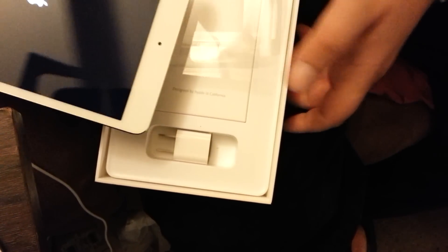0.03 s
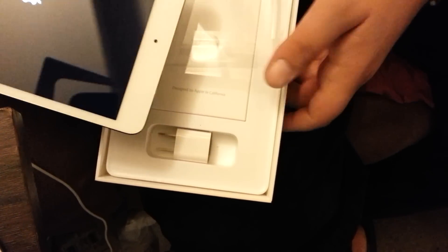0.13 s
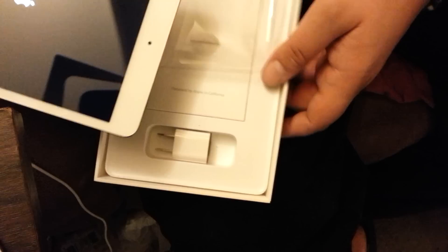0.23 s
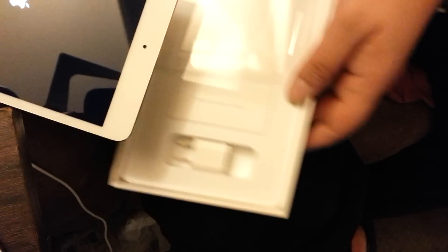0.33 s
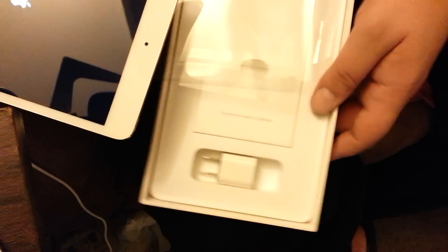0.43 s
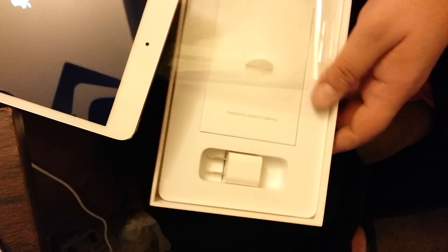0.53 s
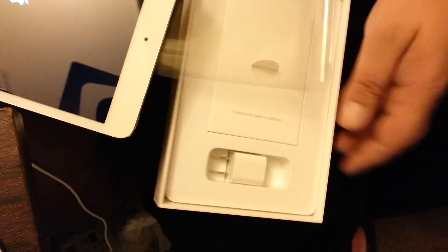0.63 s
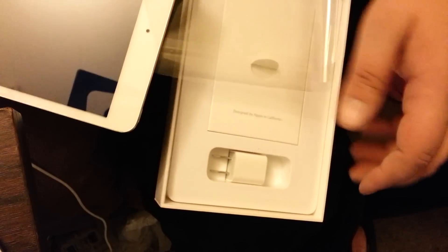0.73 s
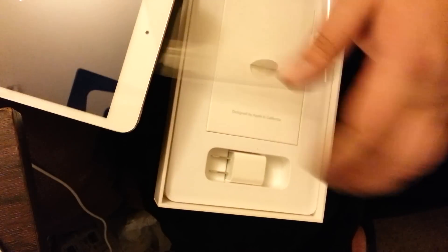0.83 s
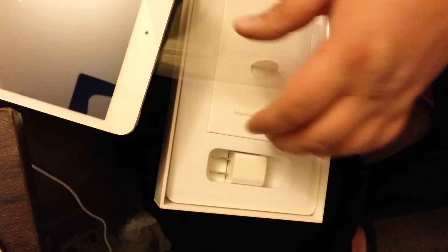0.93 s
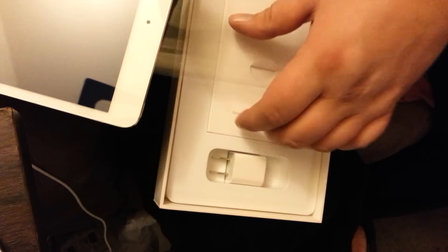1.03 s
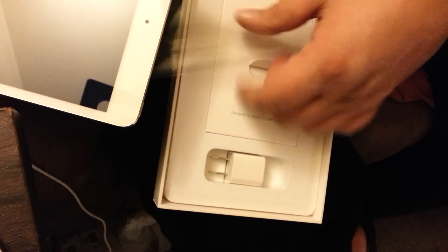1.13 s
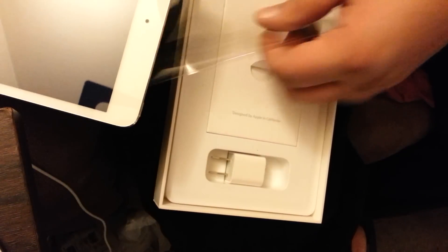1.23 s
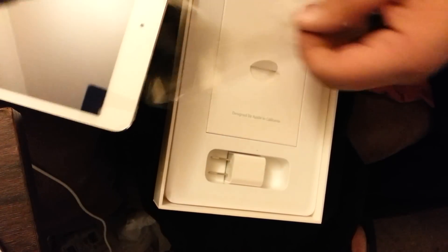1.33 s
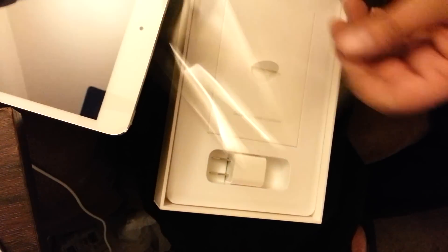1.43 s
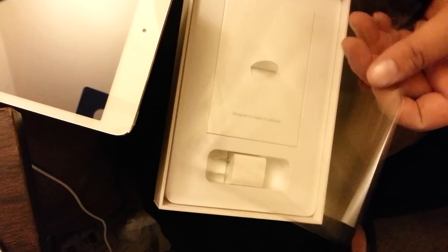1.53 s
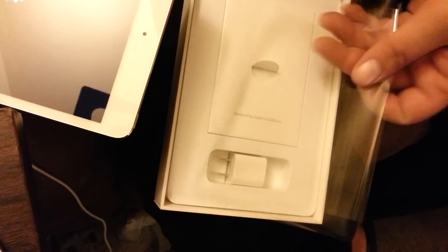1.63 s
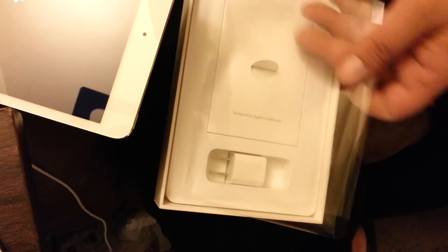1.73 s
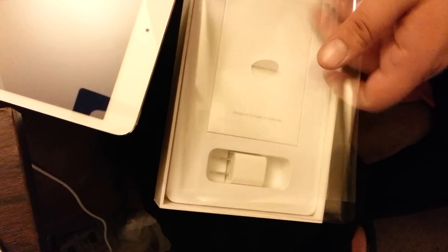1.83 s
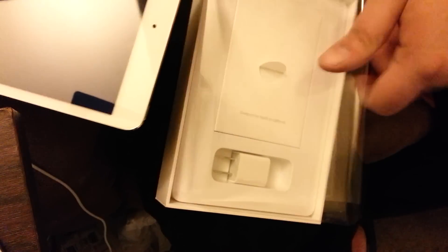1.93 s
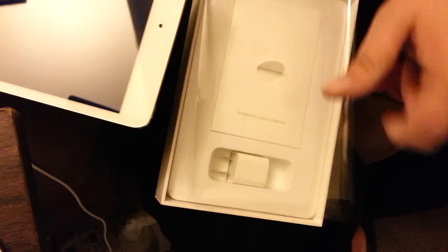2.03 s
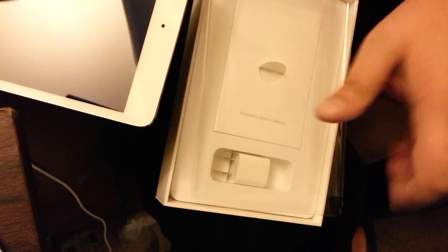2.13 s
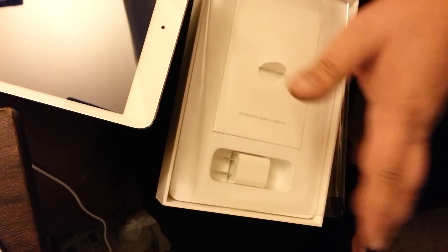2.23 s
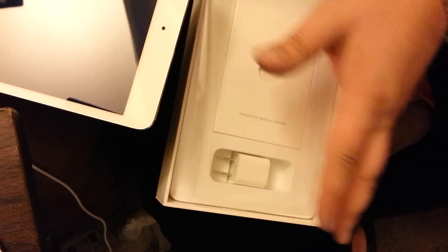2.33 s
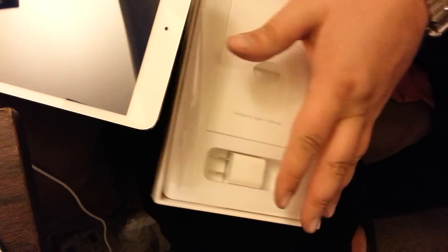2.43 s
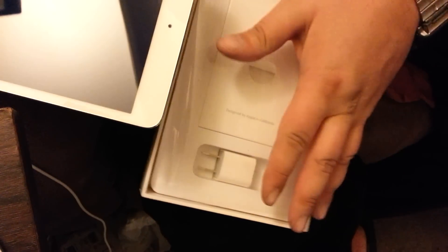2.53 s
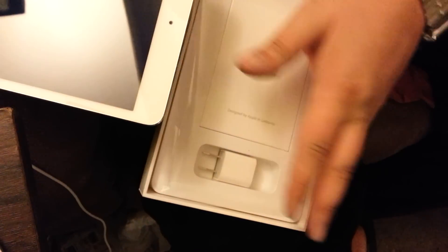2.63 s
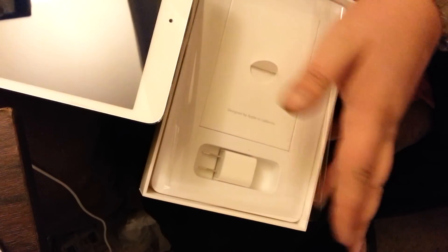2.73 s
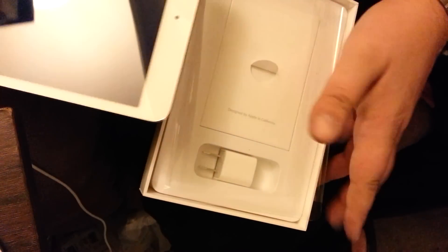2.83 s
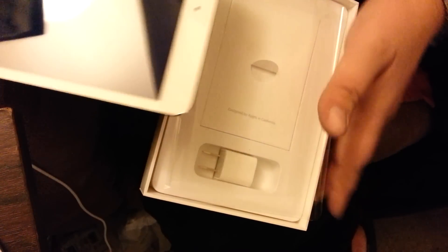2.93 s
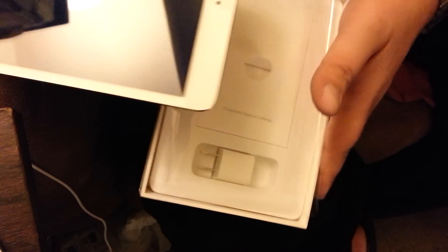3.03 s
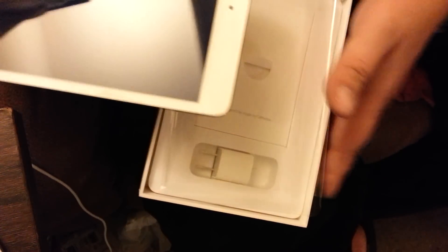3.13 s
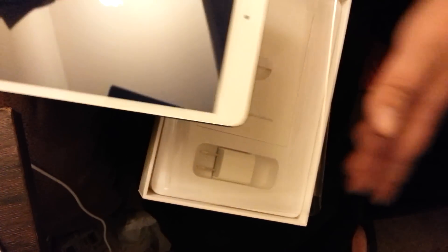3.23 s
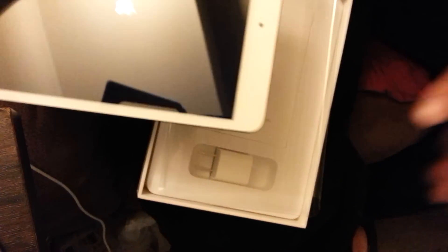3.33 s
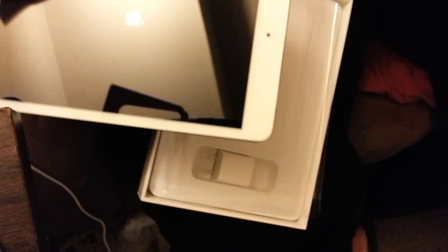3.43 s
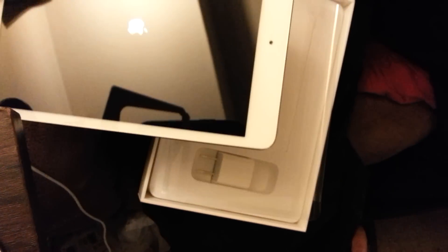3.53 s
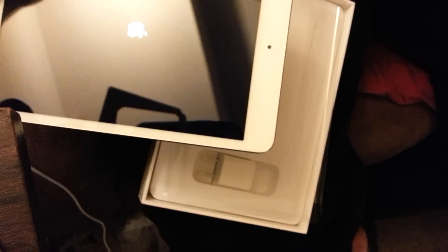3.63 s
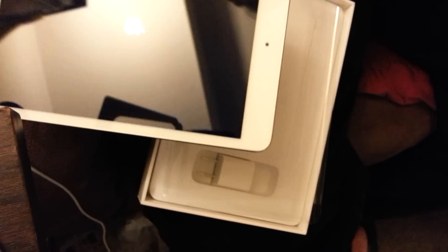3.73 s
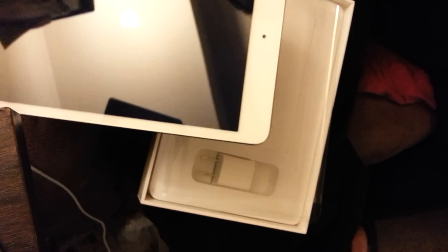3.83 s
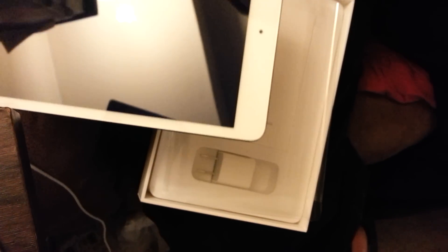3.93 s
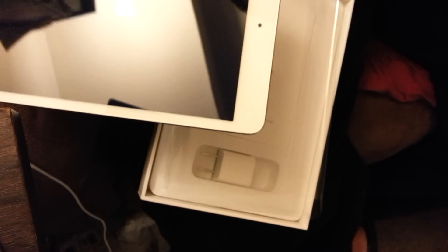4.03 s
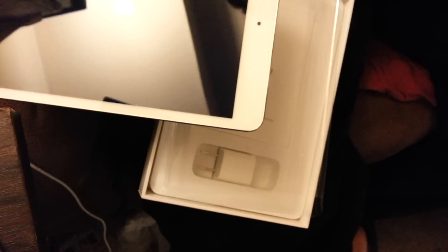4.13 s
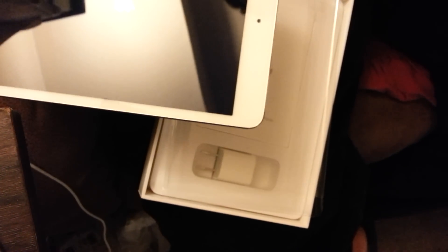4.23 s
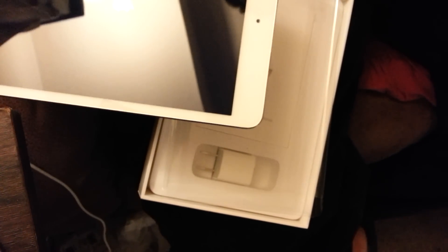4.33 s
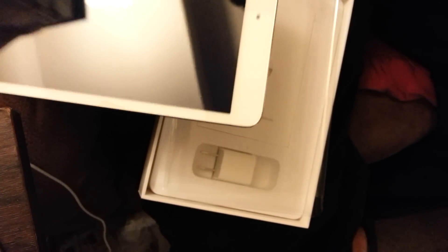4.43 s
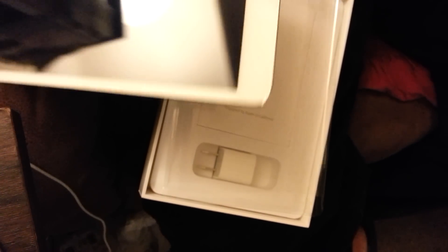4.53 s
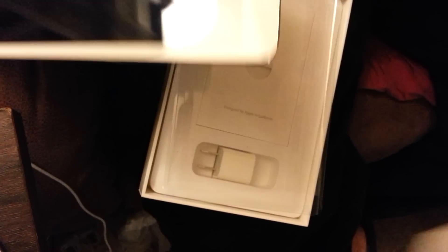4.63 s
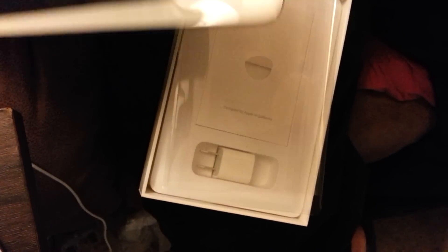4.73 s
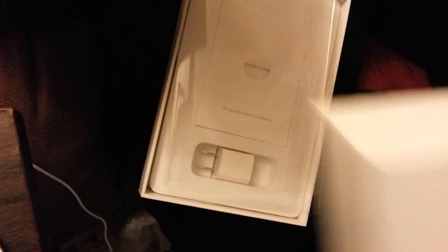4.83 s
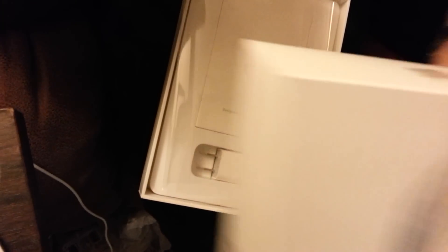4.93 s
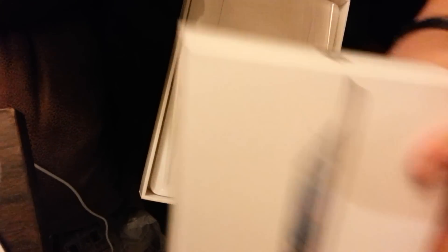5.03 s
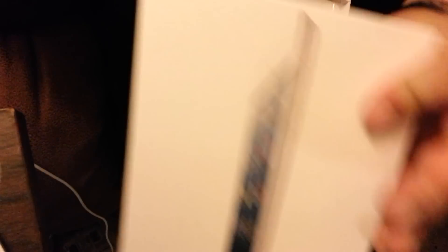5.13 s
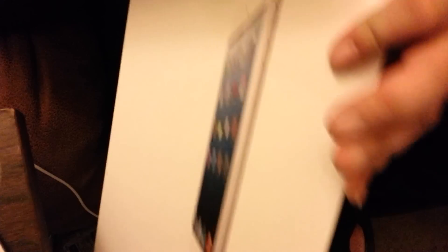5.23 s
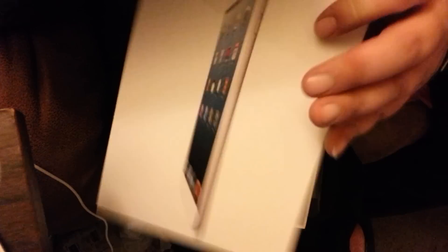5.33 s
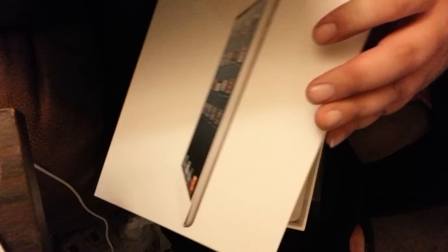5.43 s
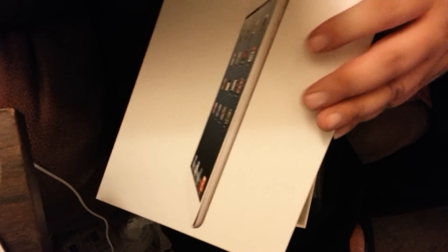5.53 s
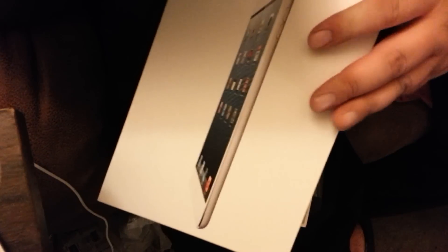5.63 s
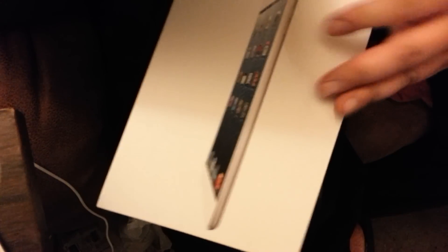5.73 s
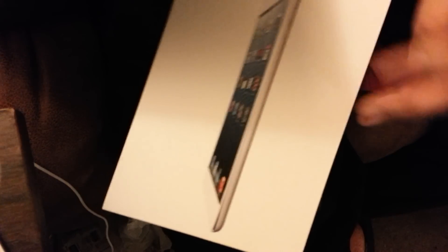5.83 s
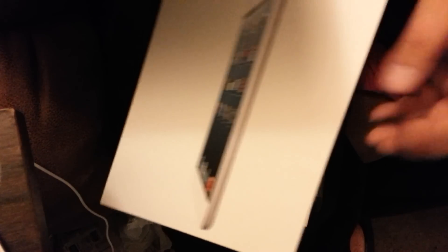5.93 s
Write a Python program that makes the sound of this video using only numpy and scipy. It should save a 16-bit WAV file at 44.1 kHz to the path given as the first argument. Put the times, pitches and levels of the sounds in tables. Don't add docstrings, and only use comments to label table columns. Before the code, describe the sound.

Close by in a quiet small room, hands lay stiff clear plastic film into a box tray: uneven crinkles, dry snaps and small hollow taps for about two and a half seconds. A lull follows with only faint brushing and ticks. Then a cardboard lid lands with a loud hollow knock, bounces, and ends with a bright click. Stereo, hands slightly right.

```python
import sys
import numpy as np
from scipy import signal
from scipy.fft import rfft, irfft, next_fast_len
from scipy.io import wavfile

SR = 44100
rng = np.random.default_rng(int(sys.argv[2]) if len(sys.argv) > 2 else 0)


def undo_db(level):
    steps = np.asarray(level, float) / 20
    return 10 ** steps


def to_wav(sig):
    pcm = np.clip(np.atleast_2d(sig), -1, 1) * 32767
    pcm = np.round(pcm).astype(np.int16)
    wavfile.write(sys.argv[1], SR, pcm.T)


N = 263277

# start_s, hold_s, crinkle_db, brightness_db
FILM_STROKES = [(0, 0.036, -49, -8), (.1, 0.16, -46, -4.5), (.235, 0.071, -46.5, -2),
                (.35, 0.045, -50, -4.5), (.45, 0.12, -57, -3.5), (.6, 0.3, -67.5, -3),
                (1.045, 0.03, -44.5, -3.5), (1.1, 0.044, -51.5, 0), (1.235, 0.11, -53, -1.5),
                (1.41, 0.022, -50, -1), (1.505, 0.01, -47, -7), (1.58, .1, -59.5, 0.5),
                (1.7, 0.035, -51, 0), (1.79, 0.0087, -50, -2.5), (1.9, 0.07, -47.5, -6.5),
                (2.02, 0.15, -61, -6.5), (2.36, 0.076, -51, -4.5), (2.47, .24, -59.5, -5)]
# start_s, hold_s, crinkle_db, brightness_db
CLOTH_STROKES = [(3.04, 0.12, -59, -6), (3.2, 0.4, -62, -6), (3.77, 0.045, -56.5, -3),
                 (3.85, 0.062, -59.5, -6), (3.96, 0.03, -56, -2), (4.06, 0.088, -60.5, 2.5),
                 (4.25, 0.3, -66.5, -2), (4.52, 0.036, -58.5, 3.5), (4.62, 0.1, -62.5, -0.5),
                 (4.72, 0.059, -62.5, -0.5), (4.92, 0.022, -60.5, 0.5), (5.1, 0.023, -60.5, -12)]
# start_s, hold_s, crinkle_db, brightness_db
LID_STROKES = [
    (5.36, .04, -62.5, -4),
    (5.43, 0.056, -51, -5),
    (5.53, 0.089, -59, -4),
    (5.675, 0.0092, -59.5, 4),
    (5.755, .04, -66, 3),
    (5.805, 0.012, -48, -8),
    (5.85, 0.027, -66, 9),
    (5.89, 0.068, -57.5, -4),
]
# start_s, length_s, crinkle_db, tilt_db_per_octave, brightness_db
FLURRIES = [(0.442, 0.017, -49.5, -3, -18), (1.007, 0.065, -45.5, 2, -22), (1.184, 0.021, -45, 4.5, 1.5),
            (1.216, 0.02, -37, 0.5, -10.5), (1.358, 0.023, -45.5, -2, -8), (1.379, 0.018, -36, 1, -12),
            (1.401, 0.021, -44, -2, -3), (1.4618, 0.014, -34.5, -3, -5), (1.68, 0.004, -36, -1.5, -18),
            (1.75, 0.018, -45, 3, -20), (1.843, .014, -41.5, 1, -9), (1.855, 0.023, -41, -4, -10),
            (1.886, 0.015, -44, -5.5, -18), (1.917, 0.02, -46, -6.5, -10), (2.132, 0.024, -51, -1, -10),
            (2.3795, .006, -41, 4, -6), (2.391, 0.0097, -36.5, 0.5, -1.5), (3.021, 0.018, -51.5, 0.5, -4.5),
            (3.647, 0.018, -59.5, -7.5, 0), (4.596, 0.025, -57.5, 0, 3), (5.762, 0.024, -54, 4, -7)]
# start_s, length_s, hollow_db, brightness_db
SCUFFS = [
    (5.401, 0.02, -39, -20),
    (5.462, 0.014, -28, -15.5),
    (5.499, 0.013, -36, -21),
    (5.832, 0.0071, -41.5, 2),
    (5.947, 0.0082, -49, -7),
]
# start_s, hold_s, lowest_band_db, upper_bands_db
SLIDES = [
    (.06, .27, -56, -50),
    (3.36, .21, -62, -80),
]
# pitch_hz, width_hz, level_db
SINGING_BANDS = [(2360, 70, -3), (3600, 420, -3), (4460, 330, -3), (4880, 220, -4), (5310, 170, -2),
                 (5620, 140, -6)]
# start_s, peak_db, pitch_hz, ring_cycles
PINGS = [(.276, -31, 2960, 40), (.307, -40, 3520, 40), (.335, -42, 3460, 30), (.184, -36, 5330, 70),
         (.106, -44, 5230, 70), (1.185, -44, 3700, 25), (1.194, -35, 4420, 25), (1.200, -46, 2350, 25),
         (1.218, -34, 2300, 40), (1.2245, -42, 4100, 35), (1.228, -33, 2330, 35), (1.229, -39, 3420, 35),
         (1.230, -36, 4910, 67), (1.236, -26.5, 3360, 34), (1.6795, -36, 4030, 22), (1.6797, -27, 2800, 35),
         (1.681, -34, 2110, 22), (1.6795, -40, 9020, 30), (1.6795, -42, 11700, 30),
         (2.6918, -34.5, 875, 3.7), (2.692, -38, 4600, 28), (1.8955, -34, 950, 4.0), (1.898, -36, 520, 5.4),
         (1.283, -33, 2150, 18), (1.375, -35, 1390, 14), (1.392, -35, 1510, 16), (1.392, -38, 750, 8.7),
         (1.464, -35, 2000, 14), (1.519, -44, 1600, 14), (1.539, -41, 1450, 10), (1.568, -39, 1950, 13),
         (1.848, -42, 2800, 20), (1.872, -40, 1700, 20), (2.380, -34, 4450, 40), (2.384, -33, 4400, 45),
         (2.380, -36, 1370, 18), (2.364, -44, 1250, 5), (2.395, -38, 3600, 30), (.375, -40, 1900, 8),
         (2.680, -42, 3000, 20), (2.704, -44, 1000, 4.0), (3.030, -48, 3200, 30), (3.036, -46, 4000, 30),
         (3.026, -48, 4600, 30)]
# start_s, peak_db, pitch_hz
TAPS = [(.219, -31.5, 1160), (.287, -35.5, 590), (.4555, -37, 1190), (.489, -38, 1230), (1.048, -37.5, 780),
        (1.229, -36.5, 790), (1.376, -24.5, 1470), (1.391, -31, 1450), (1.466, -36, 677), (1.867, -38, 680),
        (1.886, -33, 470), (1.895, -29.5, 794), (1.904, -39.5, 325), (1.927, -37, 620), (1.938, -36, 730),
        (1.935, -39, 210), (1.947, -43, 313), (1.965, -43, 300), (2.379, -34, 1440), (2.399, -34, 940),
        (2.429, -34, 1170), (2.696, -45, 600), (3.149, -43, 625), (3.768, -40.5, 1880)]
# start_s, peak_db, pitch_hz,
# top_end_db
SNAPS = [(0.2202, -39, 2600, -10), (0.2784, -40, 2700, -10), (0.3374, -43, 3000, -11),
         (0.3752, -28, 3900, -16), (0.488, -40, 3860, -14), (.509, -34.5, 2830, -19),
         (0.5538, -36, 3100, -10), (0.823, -40, 2730, -21), (1.011, -39, 2570, -16),
         (1.072, -31, 3480, -26), (1.283, -24.5, 2550, -33), (1.366, -28, 4000, -19),
         (1.377, -21.5, 3320, -21), (1.3919, -27, 2700, -20), (1.4075, -24, 3400, -14),
         (1.4238, -31, 3250, -14), (1.466, -29, 3300, -17), (1.4714, -24, 3540, -20),
         (1.539, -28, 3830, -15), (1.5536, -35, 3610, -4), (1.5675, -26, 3960, -3.5),
         (1.6798, -22.5, 3780, -3), (1.7766, -30, 2700, -14), (1.8625, -27, 3450, -25),
         (1.8808, -24, 2880, -21), (1.895, -35, 2820, -19), (1.9383, -28.5, 3700, -23),
         (1.973, -36, 3220, -7), (2.3798, -24, 4030, -8), (2.384, -28, 3960, -11),
         (.456, -38.5, 3130, -17), (.499, -39.5, 3910, -13), (.727, -52, 5060, -20), (.739, -47, 5000, -20),
         (0.878, -49, 4800, -12), (2.3647, -42, 4000, -4), (2.4295, -39, 3830, -13),
         (2.6177, -44, 2370, -11), (2.693, -35.5, 4270, -4), (3.016, -36, 4800, -5), (3.09, -43.5, 3470, 0),
         (3.1487, -38, 3730, -8), (3.648, -39.5, 2670, 0), (3.7674, -56, 2720, -13),
         (5.3988, -28, 2900, -14), (5.465, -21, 4530, -2), (5.508, -30.5, 3440, -20),
         (5.8027, -29.5, 4300, -28), (5.8313, -16, 4020, 6), (5.841, -45, 4030, -4),
         (5.937, -35, 4500, -21)]
# start_s, peak_db, pitch_hz
KNOCKS = [(5.3988, -24, 620), (5.406, -23.5, 635), (5.4125, -25, 810), (5.417, -50, 900),
          (5.4215, -20.5, 665), (5.429, -39, 700), (5.457, -56, 600), (5.4652, -4, 770),
          (5.4662, -32, 1330), (5.4688, -28, 503), (5.4748, -10, 690), (5.4765, -30, 1620),
          (5.4795, -24, 1050), (5.487, -21, 710), (5.5092, -16, 700), (5.5125, -29, 790), (5.521, -34, 646),
          (5.541, -38, 560), (5.788, -40, 720), (5.802, -33.5, 770), (5.8224, -25, 844), (5.84, -31.5, 746),
          (5.845, -39, 736), (5.853, -42, 740), (5.951, -39, 960), (5.957, -38, 790)]
# start_s, peak_db, pitch_hz
THUDS = [
    (5.399, -40.5, 151),
    (5.466, -36, 152),
    (5.6, -65, 141),
]
# start_s, peak_db, pitch_hz, ring_cycles
LID_RINGS = [(5.399, -27, 340, 14), (5.3986, -30, 930, 4.0), (5.408, -35, 740, 16), (5.466, -21, 332, 20),
             (5.466, -40, 210, 10), (5.4655, -19, 476, 24), (5.466, -38, 2080, 14), (5.474, -30, 1600, 35),
             (5.470, -33, 1080, 20), (5.4215, -30, 680, 14), (5.822, -44, 2100, 10), (5.803, -46, 2200, 12),
             (5.509, -29, 320, 25), (5.511, -31, 780, 14), (5.8312, -32, 8700, 25), (5.8312, -26, 4100, 25),
             (5.8312, -27.5, 3000, 28)]
# start_s, hold_s, level_db
NUDGES = [
    (5.666, 0.015, -56),
    (5.773, 0.077, -52.5),
    (5.88, 0.044, -53.5),
]
# pitch_hz, level_db, t60_s
LID_MODES = [(206, -28, .08), (330, 0, .18), (490, -4, .12), (670, -12, .11), (775, -12, .08),
             (906, -13, .06), (1013, -19, .05), (1370, -16, .05), (1593, -11, .09)]
# pitch_hz, level_db (per Hz)
CRINKLE_SPECTRUM = [(951, -5), (1420, -2), (1760, -4), (2360, -4), (4210, -3.5), (7000, -13)]
# pitch_hz, level_db (per Hz)
HISS_SPECTRUM = [(5500, 2.5), (7000, -6.5), (10000, -4), (13000, -7), (14600, -20)]
# pitch_hz, level_db (per Hz)
ROOM_SPECTRUM = [(28, -25), (80, -32), (114, -11), (161, -12.5), (260, -5), (900, -15), (5550, -31),
                 (14000, -30.5)]
# pitch_hz, correlation (-1 to 1)
ROOM_LIKENESS = [(30, .2), (70, -0.13), (150, 0.97), (380, 0.31), (950, -0.37), (2380, 0.26), (5970, -0.31),
                 (15000, 0.081)]

STEP = 64
FILM_LAG, LID_LAG, CLOTH_LAG = 6, 12, 19
CLOTH_FROM_S, CLOTH_TO_S = 3.5, 5.0
RISE_DB_PER_S, FALL_DB_PER_S = 403, 201
SLIDE_RISE_DB_PER_S, SLIDE_FALL_DB_PER_S = 204, 300
HOLLOW_FOLLOWS, HOLLOW_PER_BRIGHT = 0.8, -0.32
FILM_HOLLOW_DB, CLOTH_HOLLOW_DB, LID_HOLLOW_DB = -58, -57.5, -54.5
FLURRY_HOLLOW_DB, HOLLOW_PER_TILT = -12, -1.7
SCUFF_CRINKLE_DB, SCUFF_TILT_DB = -11.5, -11
HOLLOW_TILT_DB = 10
EDGE_HZ = 5700
PARTNER_HZ, PARTNER_DB = 4540, -5.5
PATCH_CYCLES, PATCH_DB, PATCH_SPREAD = 7.1, -6.5, 0.35
SNAP_PAN_DB = -8
NUDGE_HZ, NUDGE_T60_S = 690, 0.038
ROOM_DB = -57
HUM_HZ, HUM_WIDTH_HZ, HUM_DB = 119.4, 9.2, -68
ROOM_T60_S, WALL_CUT_HZ, WET_DB = 0.2, 12000, -17.5
CUTOFF_HZ = 14500


def rms_one(x):
    return x / np.sqrt(np.mean(x ** 2) + 1e-20)


def at_hz(points, hz):
    pitch_hz, level = np.array(points).T
    return np.interp(np.log(hz), np.log(np.maximum(pitch_hz, 1)), level)


def band(x, low_hz, high_hz):
    sos = signal.butter(2, [low_hz, min(high_hz, SR / 2.2)], "band", fs=SR, output="sos")
    return signal.sosfilt(sos, x)


def no_bass(x, hz):
    return signal.sosfilt(signal.butter(4, hz, "high", fs=SR, output="sos"), x)


def no_top(x):
    return signal.sosfilt(signal.cheby2(6, 25, EDGE_HZ * 1.08, fs=SR, output="sos"), x)


def drift(rate):
    r = np.exp(-80 * np.pi * rate / SR)
    noise = rng.standard_normal(N // 40 + 2002)
    slow = signal.lfilter([1], [1, -2 * r, r * r], noise)[2000:]
    return np.interp(np.arange(N) / 40, np.arange(len(slow)), rms_one(slow))


def ring(clicks, hz, t60):
    r = undo_db(-60 / (t60 * SR))
    w = 2 * np.pi * hz / SR
    return signal.lfilter([0, np.sin(w)], [1, -2 * r * np.cos(w), r * r], clicks + 1e-18)


def add(track, s, sound):
    i = round(s * SR)
    track[..., i:i + sound.shape[-1]] += sound[..., :N - i]


def ports(x, pan_db, count):
    left, right = x * np.ones((2, 1))
    late = np.concatenate([np.zeros(count), left[:len(left) - count]])
    return np.array([late * undo_db(pan_db / 2), right * undo_db(-pan_db / 2)])


def stroke_db(s, hold, rise, fall):
    t = np.arange(0, N + STEP, STEP) / SR
    return -rise * np.maximum(s - t, 0) - fall * np.maximum(t - s - hold, 0)


def every_sample(rows):
    return np.array([np.interp(np.arange(N) / STEP, np.arange(len(row)), row) for row in rows])


def grains(per_s, spread_db, clump_db, alike):
    sizes = undo_db(spread_db * np.minimum(rng.exponential(1, N), 3.0)) * rng.choice([-1, 1], N)
    rate = per_s * undo_db(clump_db * np.clip(drift(25), -2, 1.3))
    born = sizes * (rng.random(N) < rate / SR)
    share = np.clip(alike, 0, 1)
    return born * (np.sqrt(share) + np.sqrt(1 - share) * rng.standard_normal((2, N)))


def patches(source, spectrum, low_hz, high_hz, count, cycles, patchy_db, tilt_db=0):
    pitches = np.geomspace(low_hz, high_hz, count)
    dealt = rng.integers(0, count, N)
    out = 0
    for k, hz in enumerate(pitches):
        level_db = at_hz(spectrum, hz) + patchy_db * drift(31.0) + tilt_db * np.log2(hz / 2800)
        gain = undo_db(level_db) * np.sqrt(hz)
        out = out + gain * rms_one(ring(source * (dealt == k), hz, cycles / hz))
    return rms_one(out)


def effort():
    slow, tilt, t = 0, np.zeros(N), np.arange(5000) / SR
    hands = [(FILM_STROKES, FILM_HOLLOW_DB), (CLOTH_STROKES, CLOTH_HOLLOW_DB),
             (LID_STROKES, LID_HOLLOW_DB)]
    for strokes, base_db in hands:
        for s, hold, db, bright_db in strokes:
            hollow_db = base_db + HOLLOW_FOLLOWS * (db + 55) + HOLLOW_PER_BRIGHT * bright_db
            shape = undo_db(stroke_db(s, hold, RISE_DB_PER_S, FALL_DB_PER_S))
            slow = slow + (undo_db(np.array([[db], [db + bright_db], [hollow_db]])) * shape) ** 2
    power = every_sample(slow)
    bursts = []
    for s, length, db, tilt_db, bright_db in FLURRIES:
        hollow_db = db + FLURRY_HOLLOW_DB + HOLLOW_PER_TILT * tilt_db
        bursts.append((s, length, [db, db + bright_db, hollow_db], tilt_db))
    for s, length, db, bright_db in SCUFFS:
        bursts.append((s, length, [db + SCUFF_CRINKLE_DB, db + bright_db, db], SCUFF_TILT_DB))
    for s, length, levels_db, tilt_db in bursts:
        shape = (1 - np.exp(-t / 0.0013)) * np.exp(-np.maximum(t - length, 0) / 0.011)
        add(power, s, (undo_db(np.array(levels_db))[:, None] * shape) ** 2)
        add(tilt, s, tilt_db * shape)
    return *np.sqrt(power), tilt


def rubbing():
    crinkle_gain, hiss_gain, hollow_gain, tilt = effort()
    crinkle = patches(grains(12000, 0.51, .6, 0.28), CRINKLE_SPECTRUM, 985, 5770,
                      count=14, cycles=23, patchy_db=3.0, tilt_db=tilt)
    crinkle = no_top(crinkle)
    hiss = patches(grains(16000, 0.52, 0.96, 0.062), HISS_SPECTRUM, 5830, 11950,
                   count=7, cycles=5.7, patchy_db=2.5)
    slips = grains(1200, 1.0, 3.0, 1.0)
    hollow = 0
    for hz, db, t60 in LID_MODES[1:6]:
        gain = undo_db(db + HOLLOW_TILT_DB * np.log2(hz / 600))
        hollow = hollow + gain * ring(slips, hz, 0.088 * t60)
    hollow = rms_one(hollow)
    sleeve = (np.arange(N) > CLOTH_FROM_S * SR) & (np.arange(N) < CLOTH_TO_S * SR)
    for layer in crinkle, hiss:
        layer[0] = np.where(sleeve, np.roll(layer[0], CLOTH_LAG - FILM_LAG), layer[0])
    return (ports(crinkle_gain * crinkle, -5.5, count=FILM_LAG)
            + ports(hiss_gain * hiss, -3.3, count=FILM_LAG)
            + ports(hollow_gain * hollow, -0.74, count=FILM_LAG))


def room_tone():
    out, edges = 0, 24 * 2 ** np.arange(0, 9.6, .5)
    white = rng.standard_normal((2, 2, N))
    for k, (low, high) in enumerate(zip(edges, edges[1:])):
        mid, side = band(white[k % 2], low, high)
        hz = np.sqrt(low * high)
        alike = np.clip(at_hz(ROOM_LIKENESS, hz), -1, 1)
        gain = undo_db(at_hz(ROOM_SPECTRUM, hz) + 0.085 * drift(8.4))
        out = out + gain * (np.sqrt(1 + alike) * mid + np.sqrt(1 - alike) * side * [[1], [-1]])
    phase = 2 * np.pi * np.cumsum(HUM_HZ + HUM_WIDTH_HZ / 2 * drift(9)) / SR
    hum = np.sqrt(2) * undo_db(HUM_DB + 2.5 * drift(7)) * np.sin(phase)
    return undo_db(ROOM_DB) * out / out.mean(axis=0).std() + hum


def walls(x):
    size = next_fast_len(N + SR)
    w = 2 * np.pi * np.arange(size // 2 + 1) / size
    dull = 1 / (1 + 1j * w * SR / (2 * np.pi * WALL_CUT_HZ))
    lags = rng.uniform(.006, .03, (2, 5)) * SR
    echo = np.zeros((2, len(w)), complex)
    for side, row in enumerate(lags):
        for k, lag in enumerate(row):
            loop = undo_db(-60 * lag / SR / ROOM_T60_S) * dull * np.exp(-1j * w * lag)
            echo[side] += (-1) ** k * loop / (1 - loop)
    return irfft(echo * rfft(x, size), size)[:, :N]


def sliding():
    friction = grains(6000, 2.0, 1.8, 0.087)
    levels = []
    for s, hold, *db in SLIDES:
        levels.append(stroke_db(s, hold, SLIDE_RISE_DB_PER_S, SLIDE_FALL_DB_PER_S) + np.array(db)[:, None])
    lowest_db, upper_db = every_sample(np.max(levels, axis=0))
    hz, width, db = SINGING_BANDS[0]
    lowest = rms_one(ring(friction, hz, 2.6 / width))
    partner = rms_one(ring(friction, PARTNER_HZ, 3.2 / width))
    out = undo_db(lowest_db + db) * (lowest + undo_db(PARTNER_DB) * partner)
    stroke = SR // 2
    swell = drift(22)
    for k, (hz, width, db) in enumerate(SINGING_BANDS[1:]):
        line = rms_one(ring(friction[:, :stroke], hz, 2.8 / width))
        own_swell = swell[k * stroke:(k + 1) * stroke]
        add(out, 0, undo_db(upper_db[:stroke] + db + 0.48 * own_swell) * line)
    return out


def pings(table, onset_cycles):
    out, click = np.zeros(N), np.eye(1, 4000)[0]
    for s, peak_db, hz, cycles in table:
        push = ring(click, hz, onset_cycles / hz)
        sound = ring(push, hz, cycles / hz)
        add(out, s, -undo_db(peak_db) * sound / np.abs(sound).max())
    return out


def thumps(table, cycles, modes_db, shorten):
    out, click = np.zeros(N), np.eye(1, 3000)[0]
    for s, peak_db, hz in table:
        push = ring(ring(click, hz, cycles / hz), hz, cycles / hz)
        push = push / np.abs(push).max()
        strength_db = rng.normal(0, 3, len(LID_MODES))
        body = 0
        for (f, db, t60), d in zip(LID_MODES, strength_db):
            body = body + undo_db(db + d) * ring(push, f, shorten * t60) * f / SR
        add(out, s, -undo_db(peak_db) * (push + undo_db(modes_db) * body))
    return out


def snaps():
    out, t = np.zeros((2, N)), np.arange(900) / SR
    for s, peak_db, hz, top_db in SNAPS:
        chance = rng.standard_normal(len(t)) + 2.0 * rng.standard_normal((2, len(t)))
        decay = 0.65 * np.exp(-t / 0.0016) + 0.095 * np.exp(-t / 0.02)
        spray = 8.9 * (t == 0) + chance * decay
        body = band(spray, hz / 1.3, hz * 1.45) + 0.6 * band(spray, hz / 2.0, hz * 1.2)
        for f in hz * 2 ** (PATCH_SPREAD * rng.standard_normal(3)):
            patch = ring(spray, min(f, SR / 3), PATCH_CYCLES / f)
            body = body + undo_db(PATCH_DB) * np.pi * f / SR * patch
        top = band(spray, 6200, 15000)
        sound = ports(body / np.abs(body).max(), SNAP_PAN_DB, count=FILM_LAG)
        sound = sound + ports(undo_db(top_db) * top / np.abs(top).max(), -2.0, count=FILM_LAG)
        add(out, s - .0002, undo_db(peak_db) * sound / np.abs(sound.mean(axis=0)).max())
    return out


def nudging():
    levels = [db + stroke_db(s, hold, RISE_DB_PER_S, SLIDE_FALL_DB_PER_S) for s, hold, db in NUDGES]
    level_db = every_sample([np.max(levels, axis=0)])[0]
    slips = rng.standard_normal(N) * (rng.random(N) < 900 / SR)
    return undo_db(level_db) * rms_one(ring(slips, NUDGE_HZ, NUDGE_T60_S))


def scene():
    tray = ports(pings(PINGS, onset_cycles=4.2), -6.5, count=FILM_LAG)
    tray = tray + ports(thumps(TAPS, cycles=5.9, modes_db=-50, shorten=0.78), -1.3, count=FILM_LAG)
    lid = ports(thumps(KNOCKS, cycles=4.86, modes_db=2.5, shorten=0.32), -0.37, count=LID_LAG)
    lid = lid + ports(pings(LID_RINGS, onset_cycles=1.2), -.4, count=LID_LAG)
    table = thumps(THUDS, cycles=4.6, modes_db=-33, shorten=.6)
    near = no_bass(rubbing() + no_top(sliding()) + snaps() + lid + nudging(), 310)
    near = near + no_bass(tray, 170) + no_bass(table, 110)
    return near + undo_db(WET_DB) * walls(near.mean(axis=0)) + room_tone()


def roll_off(x):
    return signal.sosfilt(signal.butter(12, 15400, fs=SR, output="sos"), x)


def record(dry):
    low_pass = signal.ellip(8, .5, 30, CUTOFF_HZ, fs=SR, output="sos")
    mix = signal.sosfilt(low_pass, dry)
    return roll_off(mix)


dry = scene()
out = record(dry)
to_wav(out)
```